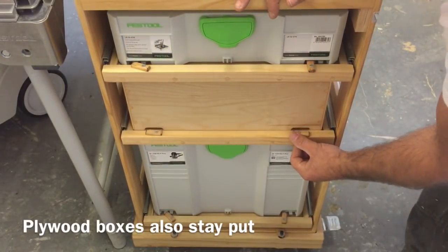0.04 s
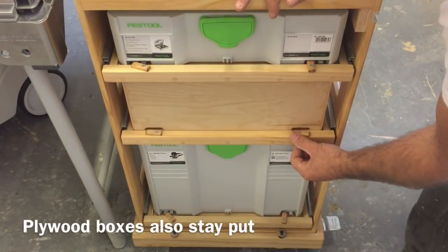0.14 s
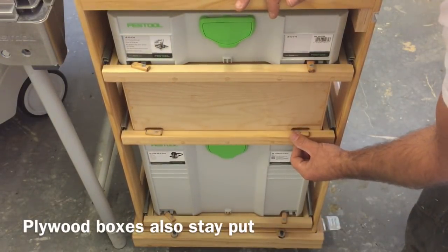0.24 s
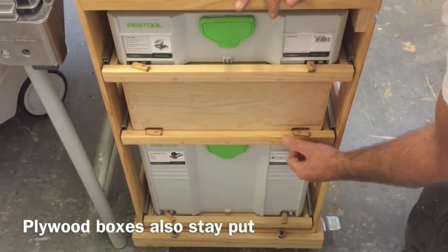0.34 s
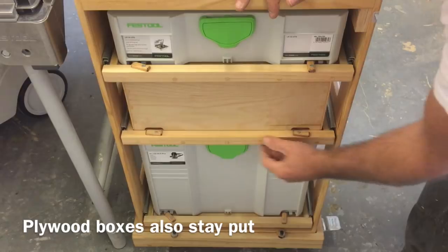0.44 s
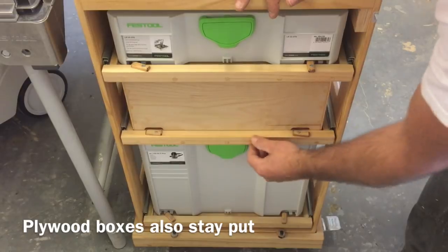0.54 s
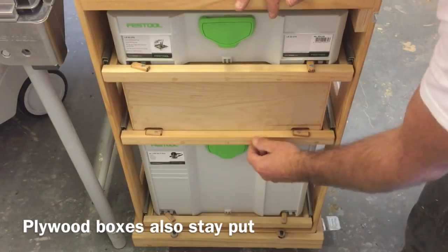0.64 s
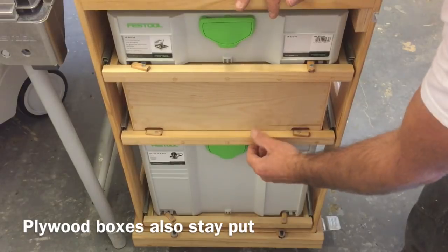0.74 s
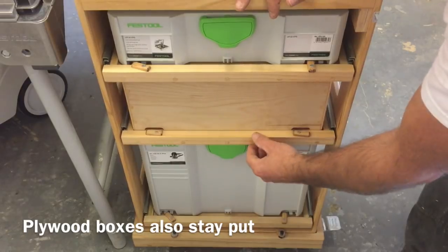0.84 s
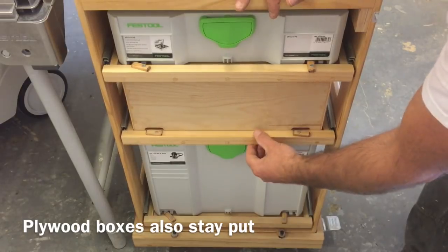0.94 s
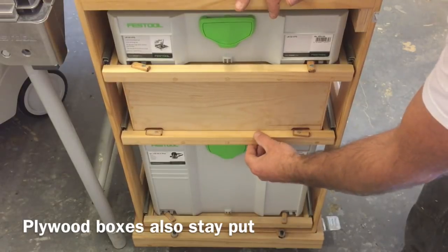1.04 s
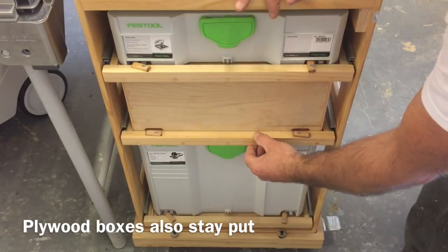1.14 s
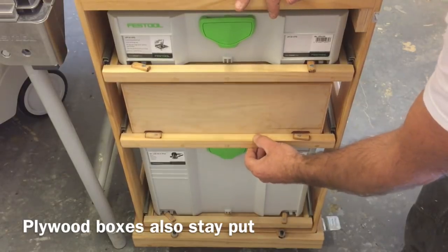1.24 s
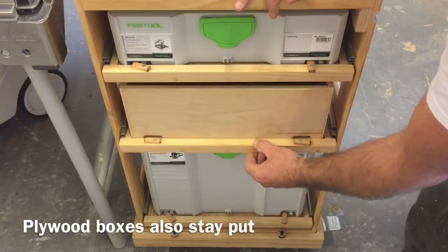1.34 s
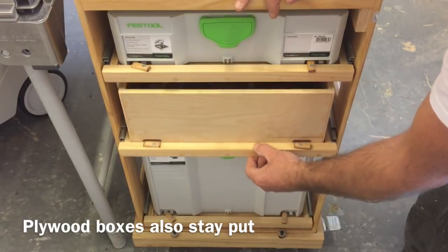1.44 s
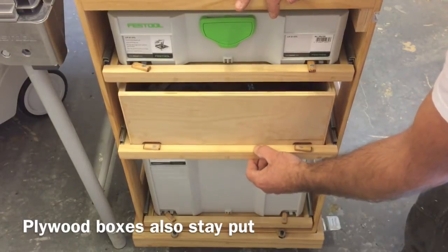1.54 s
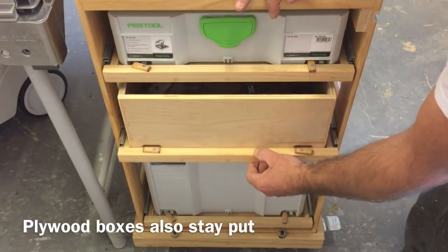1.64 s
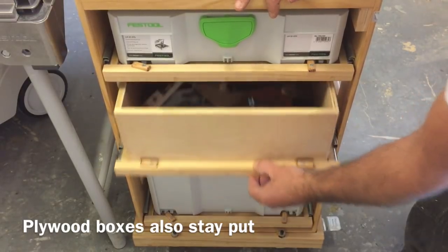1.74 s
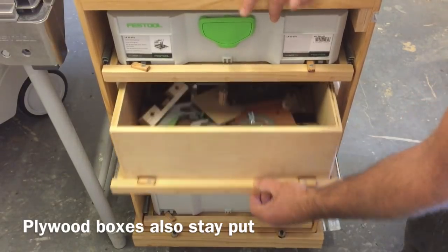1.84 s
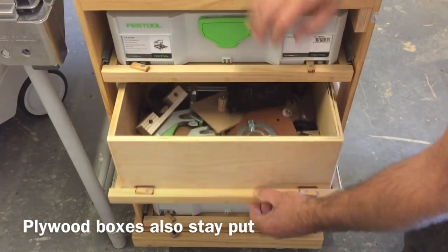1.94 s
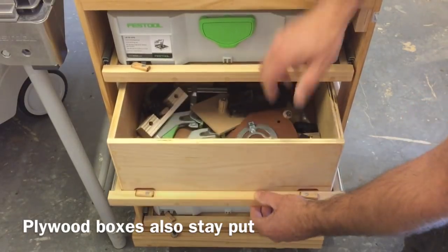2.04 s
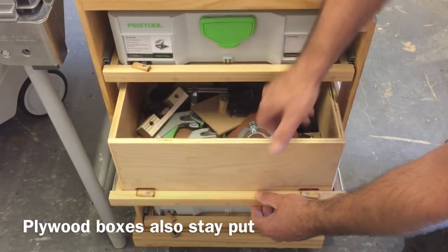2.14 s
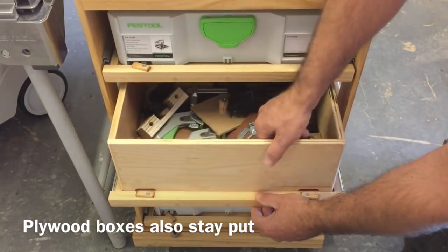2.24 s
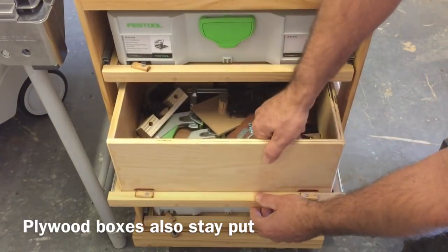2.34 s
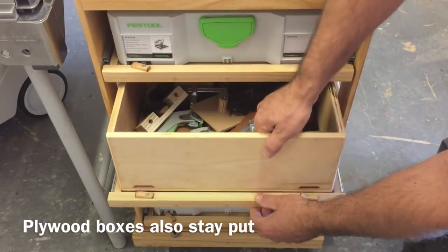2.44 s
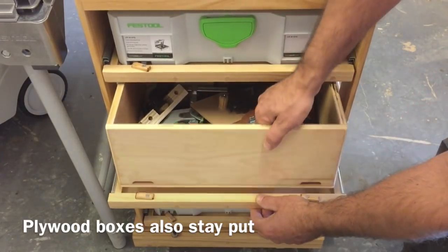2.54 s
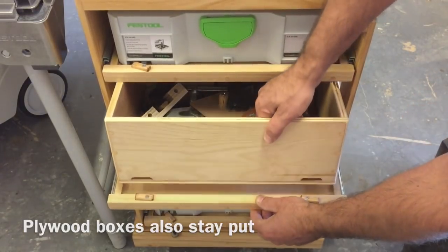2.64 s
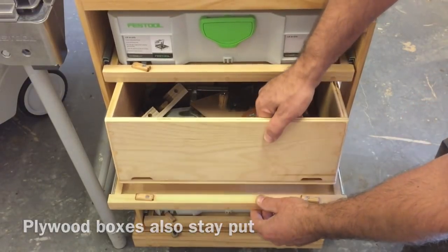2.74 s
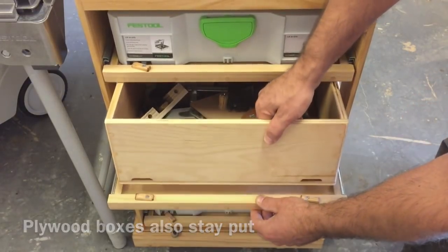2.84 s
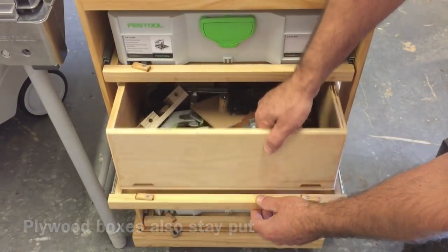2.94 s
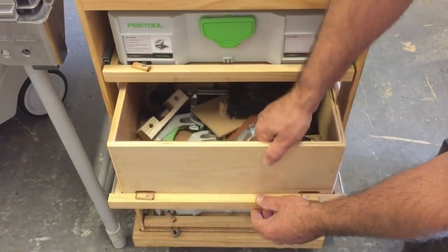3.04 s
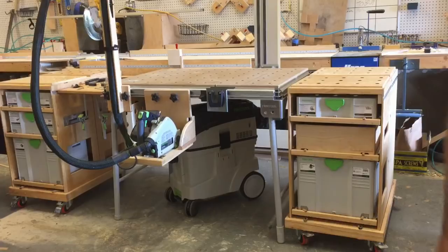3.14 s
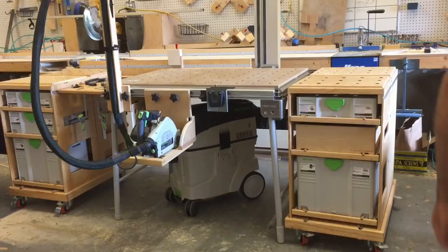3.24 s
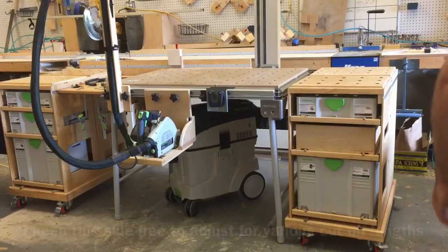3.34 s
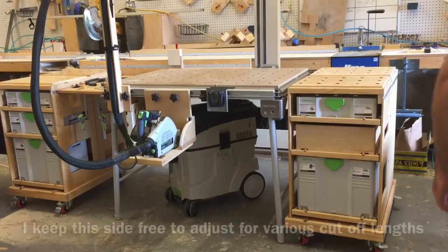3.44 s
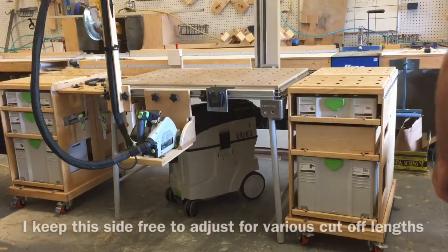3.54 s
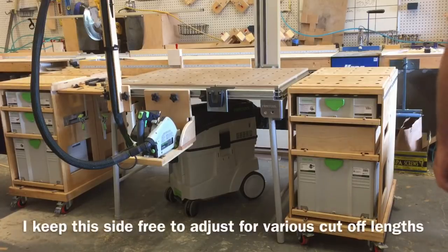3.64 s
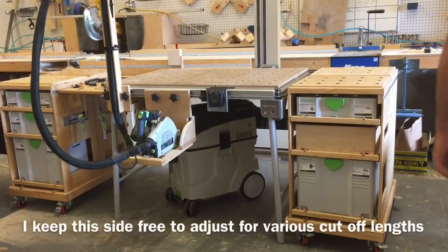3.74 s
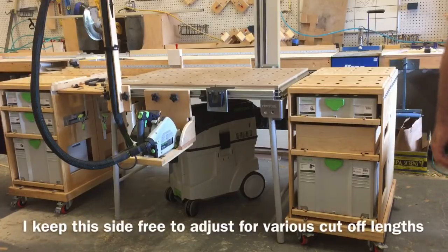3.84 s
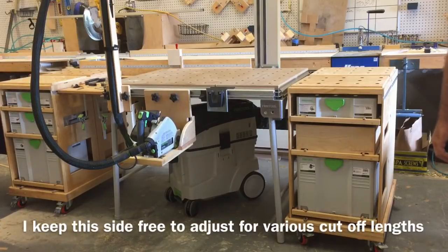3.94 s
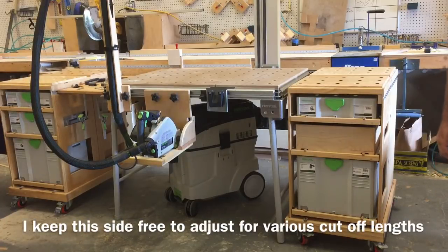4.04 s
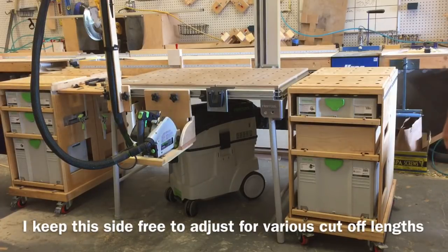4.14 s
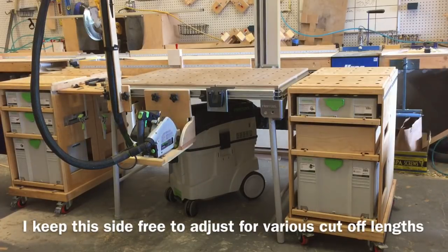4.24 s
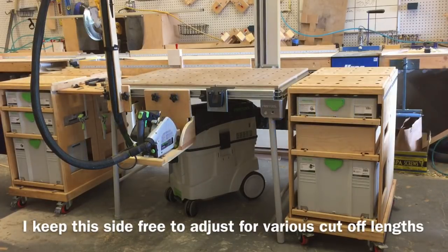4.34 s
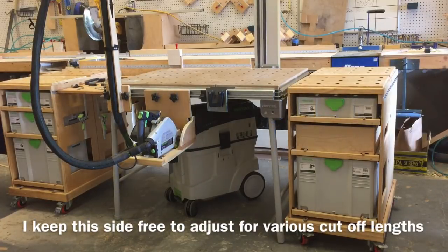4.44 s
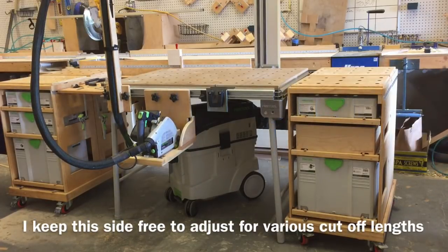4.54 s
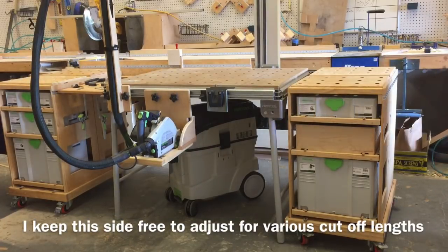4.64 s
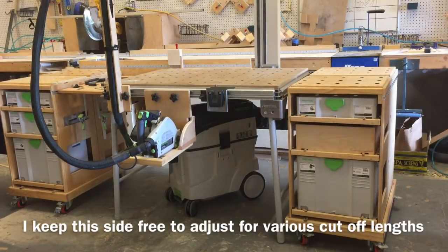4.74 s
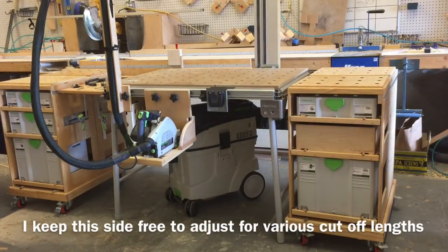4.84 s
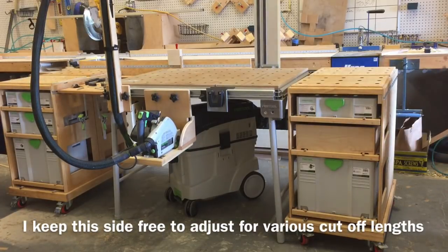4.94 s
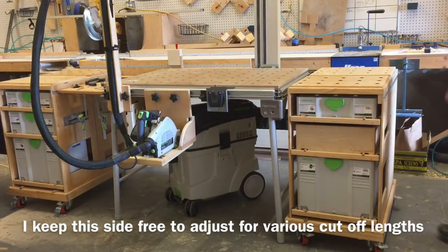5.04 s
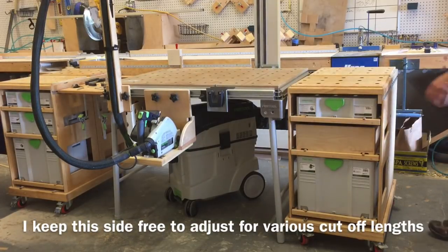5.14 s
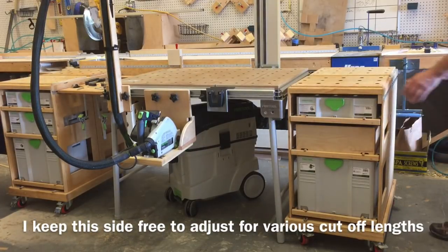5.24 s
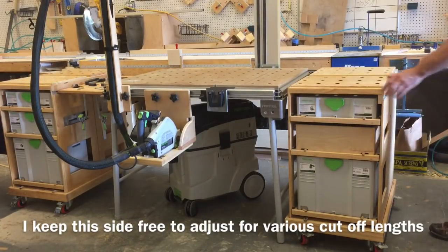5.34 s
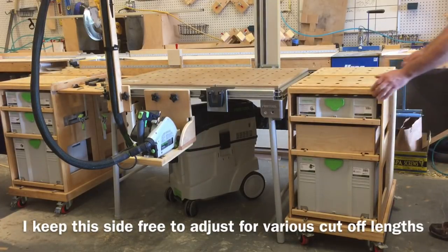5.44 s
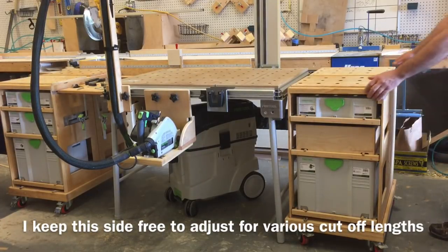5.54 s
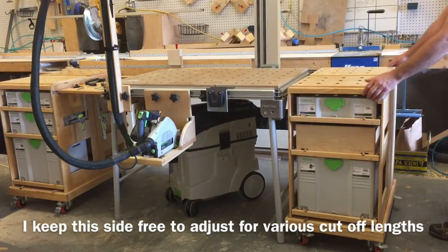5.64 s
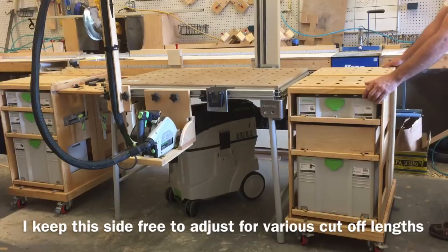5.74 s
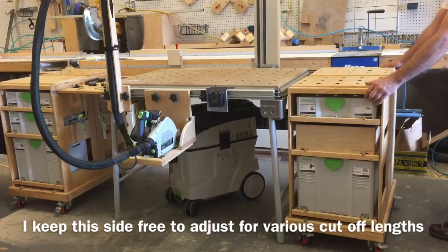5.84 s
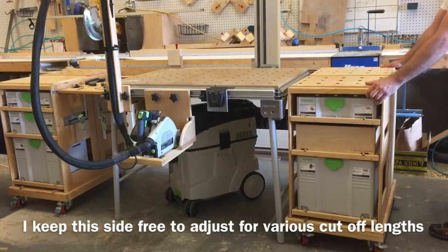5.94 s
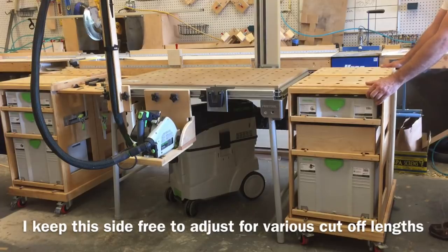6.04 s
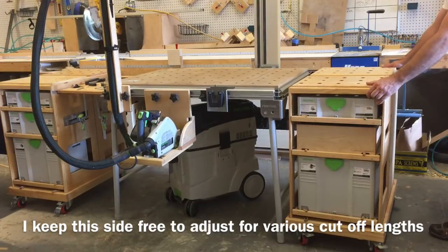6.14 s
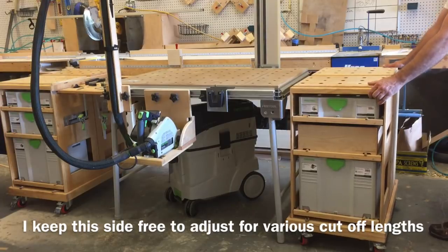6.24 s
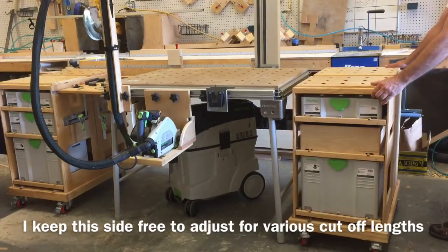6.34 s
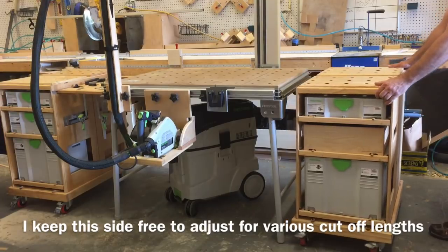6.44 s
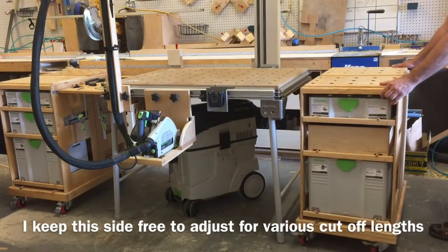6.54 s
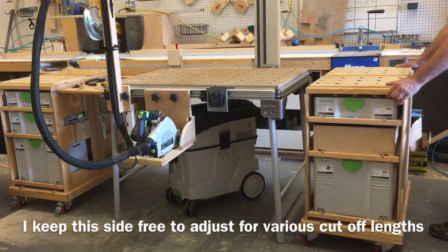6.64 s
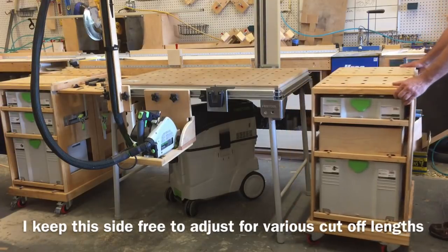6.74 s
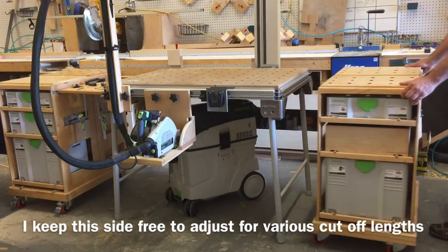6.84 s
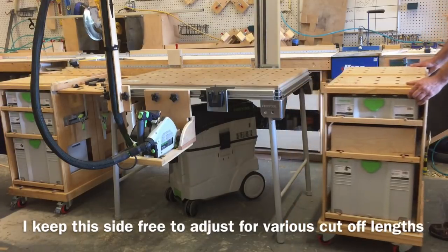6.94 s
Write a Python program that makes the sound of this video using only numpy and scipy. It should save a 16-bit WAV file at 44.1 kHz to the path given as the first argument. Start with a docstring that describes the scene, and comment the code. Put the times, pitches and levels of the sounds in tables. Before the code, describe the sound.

In a workshop, heard close up over quiet low air, a hand brushes wood at about 0.5 s, with small knocks at 0.6 and 0.8 s and faint shelf movement from 1.2 s. At 1.8 s a metal catch snaps and the shelf rolls out with bearing hiss, low rumble and a run of wooden knocks, steel clinking at 2.0 s. From 2.3 to 2.7 s a plywood box rasps along; at 2.78 s it lands with the loudest thud, a frame boom and metallic ringing, then a loose jig rocks in quickening, fading double taps. Around 3.16 s the sound cuts to a louder, humming room, with a thin brief squeal. Shoes scuff and step on concrete until about 4.7 s, amid rustling clothes. A light clack at 5.2 s marks a grip; from 6.3 s the cart jolts and rolls on grinding casters, booming increasingly to the end.

```python
"""In a woodshop, close to the microphone, a hand brushes wood, frees the catch of a cart's pull-out shelf
and rolls it out on bumping bearings. A plywood box of tools is dragged along, its panels rasping, until
it lands: wood modes thud, the frame booms, steel rings and a loose jig rocks to rest in double taps.
Then, farther off in a louder room, shoes scuff and step on concrete as filtered grains and soft bursts,
clothes rustle, and the cart is gripped and rolls away on grinding casters, its wood jolting."""
import sys
import numpy as np
from scipy import signal
from scipy.fft import rfft, irfft, next_fast_len
from scipy.io import wavfile
from scipy.ndimage import map_coordinates

SR = 44100
rng = np.random.default_rng(int(sys.argv[2]) if len(sys.argv) > 2 else 0)


def generate_wav(signal):
    """Clip the signal to [-1, 1] and save it as 16-bit WAV at the path in sys.argv[1]."""
    frames = np.transpose(np.atleast_2d(signal))
    scaled = np.clip(frames, -1, 1) * 32767
    pcm = np.round(scaled).astype(np.int16)
    wavfile.write(sys.argv[1], SR, pcm)


N = 307818
T = np.arange(N) / SR
MOVE_S = 3.162  # up to here the shop is heard beside the cart, afterwards from out in the room


def amp(db):
    """Decibels to gain."""
    return 10 ** (np.asarray(db) / 20)


def unit(x):
    """Scales to rms 1."""
    return x / np.sqrt(np.mean(x ** 2) + 1e-20)


def add(mix, s, sound):
    """Mixes a sound in at time s."""
    part = mix[round(s * SR):][:len(sound)]
    part += sound[:len(part)]


def shaped(x, gain):
    """Filters x by a function of frequency, to rms 1."""
    size = next_fast_len(len(x))
    hz = np.fft.rfftfreq(size, 1 / SR) + 1  # 1 Hz up, to keep logarithms finite
    return unit(irfft(rfft(x, size) * gain(hz), size)[:len(x)])


def coloured(x, points):
    """Gives x a spectral slope through (frequency [Hz], level [dB]) points, to rms 1."""
    hz, db = np.transpose(points)
    return shaped(x, lambda f: amp(np.interp(np.log(f), np.log(hz), db)))


def resonant(x, peaks):
    """Passes x through steep resonances (centre [Hz], nominal width [Hz], level [dB]), to rms 1."""
    def gain(f):
        return sum(amp(db) / (1 + ((f - hz) / (0.79 * width)) ** 2) for hz, width, db in peaks)
    return shaped(x, gain)


def swept(x, hz, width):
    """A broad resonance that follows the curve hz: shift down, low-pass, shift back; to rms 1."""
    turn = np.exp(2j * np.pi * np.cumsum(hz) / SR)
    lowpass = signal.butter(1, np.clip(width / 2, 5, 9000), fs=SR)
    return unit((turn * signal.filtfilt(*lowpass, x / turn)).real)


def level(s, db):
    """A gain curve through (time [s], level [dB]) points, at -140 dB outside its span."""
    return amp(np.interp(T, s, db, left=-140, right=-140))


def noise(size=N):
    """White noise."""
    return rng.standard_normal(size)


def grains(per_s, spread_db, smooth):
    """Tiny contacts of uneven size over a share of smooth friction."""
    sizes = amp(spread_db * np.minimum(rng.exponential(1, N), 4)) * rng.choice([-1, 1], N)
    contacts = unit(sizes * (rng.random(N) < per_s / SR))
    return unit(contacts + smooth * noise())


def flutter(hz, depth_db):
    """The uneven grip of a rubbing contact, as a gain that wavers mostly below hz."""
    sway = shaped(noise(), lambda f: 1 / (1 + (f / hz) ** 4))
    return unit(amp(depth_db * sway))


def stroke(s, rise, hold, release):
    """Force of a sliding contact: it climbs 20 dB in the rise, holds, and falls 20 dB per release."""
    before = np.maximum(s - T, 0) / max(rise, .003)
    after = np.maximum(T - s - hold, 0) / max(release, .003)
    return amp(-20 * np.minimum(before + after, 10))


def dying(t60, rise):
    """Envelope of a blow, half a second long: soft onset, exponential decay."""
    t = T[:SR // 2]
    return amp(-60 * t / max(t60, .005)) * (1 - np.exp(-t / max(rise, 1e-5)))


def blow(x):
    """Scales a blow to the energy of 10 ms at rms 1."""
    return x / np.sqrt(np.sum(x ** 2) / (SR / 100) + 1e-20)


def ring(modes, rise, detune):
    """Decaying modes; each blow lands on another spot, weighing and tuning them differently."""
    t = T[:SR // 2]
    chance = rng.standard_normal((len(modes), 2))
    out = np.zeros(len(t))
    for k, ((hz, db, t60), (weight, shift)) in enumerate(zip(modes, chance)):
        tone = np.sin(2 * np.pi * hz * (1 + detune * shift) * t)
        out += (-1) ** k * amp(db + 1.45 * weight) * dying(t60, rise) * tone
    return blow(out)


def burst(hz, octaves, t60, rise):
    """Decaying noise around hz, like a dense cluster of short modes."""
    band = shaped(noise(SR // 2), lambda f: np.exp(-.5 * (np.log2(f / hz) / octaves) ** 2))
    return blow(band * dying(t60, rise))


def struck(hits, modes, crack_db, crack_hz, crack_octaves, crack_t60, rise):
    """Blows on one object: its modes and the crack of the contact."""
    out = np.zeros(N)
    for s, db in hits:
        crack = amp(crack_db) * burst(crack_hz, crack_octaves, crack_t60, rise)
        add(out, s, amp(db) * (ring(modes, rise, detune=0.00057) + crack))
    return out


# air beside the cart and out in the room: (frequency [Hz], relative level [dB])
NEAR_AIR = [(15, -43), (25, -10), (39, -17), (59, -6), (130, -10.5), (149, -10), (427, -23.5), (516, -27),
            (2110, -32.5), (2760, -32.5), (7110, -38.5), (16000, -44.5)]
FAR_AIR = [(15, -41), (25, -27), (64, 3.5), (92, -33), (111, -12), (223, -4.5), (384, -26), (427, -16.5),
           (476, -39), (516, -23.5), (714, -26.5), (1840, -27), (16000, -42.5)]
NEAR_AIR_DB, FAR_AIR_DB = -64.15, -62
# machines out in the room: (centre [Hz], nominal width [Hz], level [dB])
MACHINE_HUM = [(53.3, 7.9, -62), (117, 3.6, -69), (219, 99, -70)]


def air():
    """Steady coloured noise of the shop; out in the room it is louder and machines hum in narrow bands."""
    hum = sum(amp(db) * resonant(noise(), [(hz, width, 0)]) for hz, width, db in MACHINE_HUM)
    near_air = amp(NEAR_AIR_DB) * coloured(noise(), NEAR_AIR)
    far_air = amp(FAR_AIR_DB) * coloured(noise(), FAR_AIR)
    return np.where(T > MOVE_S, hum + far_air, near_air)


# grit of a coarse scrape and of a fine hiss: (frequency [Hz], relative level [dB])
SCRAPE_COLOUR = [(59, -68), (100, 1), (239, 1), (323, -5), (492, -5), (813, -15), (1260, -6.5), (2460, -11),
                 (2630, -19), (3440, -13.5), (4810, -39), (5500, -49), (7150, -66), (12100, -120)]
HISS_COLOUR = [(2240, -8), (3800, -0.5), (4550, -5.5), (4830, -13), (6000, -3.5), (7920, -11.5), (9040, -8),
               (10500, -15), (15200, -15.5), (16000, -60)]


def coarse_scrape():
    """Sparse grit under a fluttering grip, low and rough."""
    return coloured(grains(1200, 1.9, .5), SCRAPE_COLOUR) * flutter(hz=39.7, depth_db=4.0)


def fine_hiss():
    """Dense fine contacts, bright."""
    return coloured(grains(5000, 1.7, 0.24), HISS_COLOUR)


# clothes rustling: (full force from [s], hold [s], scrape level [dB])
RUSTLES = [(3.472, 0.13, -66), (4.071, 0.055, -62.5), (4.6, 0.2, -68.5), (5.163, 0.073, -67),
           (5.486, 0.082, -68.5), (5.72, 0.011, -63.5), (5.903, .03, -73)]
RUSTLE_RISE_S, RUSTLE_RELEASE_S = 0.07, 0.18
RUSTLE_HISS_DB = -2.5  # against the scrape


def clothes():
    """Cloth slides on cloth in soft strokes of scrape and hiss."""
    texture = coarse_scrape() + amp(RUSTLE_HISS_DB) * fine_hiss()
    out = np.zeros(N)
    for s, hold, db in RUSTLES:
        out += amp(db) * stroke(s, RUSTLE_RISE_S, hold, RUSTLE_RELEASE_S) * texture
    return out


# thin squeals: (full force from [s], rise [s], hold [s], release [s], centre [Hz], level [dB])
SQUEALS = [(2.267, 0.046, 0.12, .04, 8900, -76), (3.227, 0.022, 0.018, 0.031, 5960, -48.5),
           (4.806, .03, .008, .03, 6450, -67), (5.704, 0.023, .015, 0.067, 6850, -65.5)]


def squeals():
    """Rubbing surfaces squeal thinly: one high resonance fed with noise."""
    out = np.zeros(N)
    for *shape, hz, db in SQUEALS:
        out += amp(db) * stroke(*shape) * resonant(noise(), [(hz, 940, 0)])
    return out


# soles sliding over concrete: (full force from [s], rise [s], hold [s], release [s],
# scrape level [dB], hiss level [dB], swish level [dB], swish centre [Hz])
SCUFFS = [(3.183, 0.034, 0.011, 0.058, -72, -56.5, -54, 3040),
          (3.226, 0.031, 0.018, 0.075, -49.5, -54, -53, 3900),
          (3.72, 0.081, 0.02, .16, -57.5, -59.5, -61, 2760),
          (3.813, .012, 0.011, 0.028, -59, -51.5, -60, 2210),
          (3.842, 0.018, 0.025, 0.035, -48, -48.5, -45.5, 3130),
          (4.29, 0.093, 0.051, 0.092, -49, -50.5, -46.5, 2550),
          (4.381, 0.027, 0.018, .04, -47.5, -53, -49, 1980),
          (4.417, 0.024, 0.024, 0.054, -48, -48.5, -46.5, 3900)]
SWISH_RISE_OCTAVES = 0.6  # the swish climbs from this far below its centre to this far above


def swish():
    """Each sliding sole sounds a broad resonance that climbs through the stroke."""
    force, weighted_hz = np.zeros(N), np.zeros(N)
    for s, rise, hold, release, _, _, db, hz in SCUFFS:
        gain = amp(db) * stroke(s, rise, hold, release)
        progress = np.clip((T - s - hold / 2) / (hold + rise / 2), -1, 1)
        force += gain
        weighted_hz += gain * hz * 2 ** (SWISH_RISE_OCTAVES * progress)
    grit = grains(2200, 4.1, 0.85) * flutter(hz=60, depth_db=2)
    return force * swept(grit, weighted_hz / force, width=2150)


def scuffs():
    """Shoe soles slide on concrete: coarse scrape, fine hiss and the climbing swish."""
    scrape, hiss = coarse_scrape(), fine_hiss()
    out = swish()
    for *shape, scrape_db, hiss_db, _, _ in SCUFFS:
        out += stroke(*shape) * (amp(scrape_db) * scrape + amp(hiss_db) * hiss)
    return out


# footfalls: (time [s], thump level [dB], slap level [dB], slap centre [Hz])
STEPS = [(3.455, -56.5, -78, 400), (3.542, -43, -46.5, 680), (3.7445, -50, -43.5, 610),
         (3.83, -50, -64, 350), (4.028, -56, -77, 418), (4.156, -46.5, -70, 413), (4.248, -53, -49, 590),
         (4.371, -44.5, -48.5, 500), (4.647, -45.5, -48.5, 614), (5.725, -71, -79, 394)]


def steps():
    """Soles land on concrete: a dull push and a short slap."""
    out = np.zeros(N)
    for s, thump_db, slap_db, slap_hz in STEPS:
        add(out, s, amp(thump_db) * burst(237, 0.77, t60=0.0756, rise=0.00079))
        add(out, s, amp(slap_db) * burst(slap_hz, 0.93, t60=0.09, rise=0.00039))
    return out


# plywood of box and cart: (mode [Hz], relative level [dB], t60 [s])
PLYWOOD = [(130.8, -8, 0.27), (202, 2, 0.087), (301, 5, 0.046), (359.5, -4, 0.32), (459, 6, 0.072),
           (591, 7.5, 0.032), (669, 4, 0.066), (744, -3, 0.13), (984, -31, 0.051), (1148, -0.5, 0.067),
           (1176, -25, 0.075), (1430, -64, 0.045), (1582, 4, 0.042), (1940, -4.5, 0.057),
           (2109, 9.5, 0.032), (2380, -2.5, 0.089), (2650, -31, 0.05), (3150, -5, 0.11), (3430, -15, 0.041)]


def excited(centre_hz, octaves):
    """The plywood's modes as one contact weighs them: soft contacts reach only the low ones."""
    modes = []
    for hz, db, t60 in PLYWOOD:
        loss_db = 10 / np.log(10) * (np.log2(hz / centre_hz) / octaves) ** 2
        modes.append((hz, db - loss_db, t60))
    return modes


def wood(thump_db, clack_db, clack_hz, thump_hz, joint_db):
    """Wood meets wood: the panels thump, and panels and joints clack."""
    thump = ring(excited(centre_hz=thump_hz, octaves=0.46), rise=0.0016, detune=0.017)
    panels = ring(excited(centre_hz=clack_hz, octaves=.8), rise=.0007, detune=.004)
    joints = burst(clack_hz, 0.66, t60=0.069, rise=.004)
    return amp(thump_db) * thump + amp(clack_db) * (amp(-7.5) * panels + amp(joint_db) * joints)


# the push on the cart: (full speed from [s], rise [s], hold [s], release [s])
PUSH = (6.43, 0.058, 0.44, 0.22)
# resonances of the cart's body: (centre [Hz], nominal width [Hz], relative level [dB])
CARCASS = [(135.6, 27, 21), (198, 65, -7), (95, 30, -27)]
# casters on rough concrete: (frequency [Hz], relative level [dB])
WHEEL_GRIT = [(140, -56), (230, 4), (333, 3), (465, -8), (613, -9), (965, -20.5), (1560, -31.5),
              (1880, -27), (2630, -64), (4000, -61), (5200, -72.5), (8800, -120)]
BOOM_DB, BOOM_GROWTH_DB_PER_S, WHEEL_GRIT_DB = -51, 18, -49  # the boom starts at BOOM_DB
# the cart is gripped, then jolts: (time [s], thump level [dB], clack level [dB], clack centre [Hz])
JOLTS = [(5.220, -63, -50, 2100), (6.303, -48.5, -61, 280), (6.381, -46, -59, 280),
         (6.416, -53, -43.5, 504), (6.430, -60, -44, 786), (6.554, -44, -58, 400), (6.607, -40, -47, 585),
         (6.674, -43, -48, 400), (6.702, -52, -59, 700), (6.746, -38.5, -55, 350), (6.835, -41, -52, 300),
         (6.864, -51, -46.5, 1750), (6.899, -38, -51.5, 965)]


def cart():
    """Casters grind over rough concrete; the body booms more through the push and knocks at each jolt."""
    start, _, hold, _ = PUSH
    boom_db = BOOM_DB + BOOM_GROWTH_DB_PER_S * np.clip(T - start, 0, hold)
    boom = amp(boom_db) * resonant(grains(250, 5.1, 0.68), CARCASS)
    grit = amp(WHEEL_GRIT_DB) * coloured(grains(260, 2.5, .55), WHEEL_GRIT)
    out = stroke(*PUSH) * (boom + grit)
    for s, *jolt in JOLTS:
        add(out, s, wood(*jolt, thump_hz=128, joint_db=-7.5))
    return out


# a hand brushing wood: (full force from [s], rise [s], hold [s], release [s],
# scrape level [dB], white hiss level [dB])
BRUSHES = [(0.495, 0.037, .025, 0.073, -64.5, -75), (0.613, 0.01, .031, 0.028, -55, -58.5),
           (1.99, 0.06, 0.063, 0.033, -58, -59), (2.37, 0.088, .02, .03, -62, -68)]


def hand_brushes():
    """Skin strokes the wood: the coarse scrape under plain white hiss."""
    scrape = coarse_scrape()
    out = np.zeros(N)
    for *shape, scrape_db, hiss_db in BRUSHES:
        out += stroke(*shape) * (amp(scrape_db) * scrape + amp(hiss_db) * noise())
    return out


# clicks of the shelf's catch and runners: (time [s], level before trim [dB])
CATCH_CLICKS = [(.782, -58.5), (1.7958, -30.5), (1.7985, -55), (2.664, -57), (3.144, -59.5)]
# the catch: (mode [Hz], relative level [dB], t60 [s])
CATCH_MODES = [(3460, -1, 0.076), (3690, 13, 0.021), (3880, 3, 0.029), (4120, 9, 0.037),
               (4640, -2.5, 0.051), (5000, 14, 0.023), (6250, -13.5, 0.017), (6640, -27, 0.042),
               (6850, -2, 0.076), (8300, -3, 0.059), (9200, -8, 0.023), (12100, -20, 0.024)]


def catch():
    """The catch snaps: short bright metal modes and a crack."""
    clicks = struck(CATCH_CLICKS, CATCH_MODES, crack_db=-3.0, crack_hz=4840, crack_octaves=0.87,
                    crack_t60=0.061, rise=0.0003)
    return amp(-1) * clicks  # trim


# pulls of the shelf along its runners: (full force from [s], rise [s], hold [s], release [s],
# rumble level [dB], bearing hiss level at full force [dB])
PULLS = [(1.22, 0.073, 0.037, 0.31, -63, -75), (1.42, .12, 0.018, 0.46, -60, -66),
         (1.799, 0.026, 0.15, 0.15, -40, -47.5)]
# the shaking shelf: (centre [Hz], nominal width [Hz], relative level [dB])
RUMBLE = [(135, 8, -3), (216, 71, -0.5), (305, 58, 2.5), (473, 180, -14), (700, 77, -10.5), (914, 100, -8),
          (1270, 2300, -38)]
# bearing balls: (frequency [Hz], relative level [dB])
BEARINGS = [(710, -24), (1200, 9.5), (1640, 2), (3010, -0.5), (5410, -7.5), (5900, -17), (6230, -9),
            (7910, -12.5), (11700, -31), (16000, -30)]
BEARING_SAG_DB_PER_S = 57  # the bearings quieten through the hold, after the first jerk
RUMBLE_LAG_S = 0.012  # the heavy shelf starts to shake after the bearings move


def shelf():
    """Bearing balls bump along the runners, hissing, and shake the heavy shelf into a rumble."""
    rumble = resonant(grains(400, 2.4, 0.84), RUMBLE)
    hiss = coloured(grains(1100, 2.6, 0.98), BEARINGS)
    out = np.zeros(N)
    for s, rise, hold, release, rumble_db, hiss_db in PULLS:
        sag_db = BEARING_SAG_DB_PER_S * np.clip(T - s, 0, hold)
        out += amp(hiss_db - sag_db) * stroke(s, rise, hold, release) * hiss
        out += amp(rumble_db) * stroke(s + RUMBLE_LAG_S, rise, hold, release) * rumble
    return out


# the box's weight shakes the whole frame: (time [s], level [dB])
LANDING = [(2.785, -28.5)]
# the frame: (mode [Hz], relative level [dB], t60 [s])
FRAME = [(79.5, -10, 0.13), (116, -4, 0.17), (238.3, -4.5, 0.25)]


def frame():
    """The frame booms in a few low modes when the box lands."""
    out = np.zeros(N)
    for s, db in LANDING:
        add(out, s, amp(db) * ring(FRAME, rise=.004, detune=.005))
    return out


# steel parts clinking together: (time [s], level before trim [dB])
CLINKS = [(2.0015, -34), (2.7755, -53), (2.7915, -44), (2.8020, -49), (2.865, -50)]
# the steel: (mode [Hz], relative level [dB], t60 [s])
STEEL = [(5800, -10, 0.1), (8120, 0, .03), (8250, -3, 0.051), (11200, -4, 0.054), (11680, -7, .03),
         (13800, -9, .06), (14400, -12, .035)]


def steel_clinks():
    """Steel parts knock together: very high modes and a sharp crack."""
    clinks = struck(CLINKS, STEEL, crack_db=-0.5, crack_hz=9000, crack_octaves=0.58,
                    crack_t60=0.041, rise=.0002)
    return amp(-13.0) * clinks  # trim


# one small tool is struck as the box lands: (time [s], level before trim [dB])
PING = [(2.7962, -34.5)]
# the small tool: (mode [Hz], relative level [dB], t60 [s])
PING_MODES = [(6550, 14, 0.021), (6800, -10, 0.075), (12300, -10, .03)]


def tool_ping():
    """A small tool rings in three high modes."""
    ping = struck(PING, PING_MODES, crack_db=-25, crack_hz=6940, crack_octaves=.8,
                  crack_t60=.02, rise=0.00033)
    return amp(-13.5) * ping  # trim


# the loose jig and the metal bar beside it: (mode [Hz], relative level [dB], t60 [s])
JIG = [(459, 16.5, 0.068), (695, 13.5, 0.058), (794, -45.5, 0.083), (966, 8, 0.082), (1500, -24, 0.065),
       (1780, -1, 0.08)]
BAR = [(1920, -2, 0.055), (1990, -19, 0.076), (2850, -31, 0.1)]
ROCK_S, SWING_S, SWING_RATIO = 2.872, .074, .85  # first tap, first swing, each swing against the last
SECOND_TAP_S, SECOND_TAP_DB = .021, -5  # second of a double tap, against the first
ROCK_DB, ROCK_LOSS_DB = -49, 2.3  # first tap, loss per swing
BAR_DB, BAR_LOSS_DB = -55, 4.5  # first nudge, loss per swing


def rocking(delay, db, loss_db, count):
    """Taps (time [s], level [dB]) of a rocking object, ever closer and weaker."""
    swing = np.arange(count)
    elapsed = SWING_S * (1 - SWING_RATIO ** swing) / (1 - SWING_RATIO)
    return zip(ROCK_S + delay + elapsed, db - loss_db * swing)


def rocking_jig():
    """A loose jig rocks to rest in the box in double taps; the second tap nudges a metal bar."""
    first_taps = rocking(0, ROCK_DB, ROCK_LOSS_DB, count=5)
    second_taps = rocking(SECOND_TAP_S, ROCK_DB + SECOND_TAP_DB, ROCK_LOSS_DB, count=4)
    jig = struck([*first_taps, *second_taps], JIG, crack_db=-9.5, crack_hz=780, crack_octaves=1.24,
                 crack_t60=0.12, rise=0.0014)
    nudges = rocking(SECOND_TAP_S, BAR_DB, BAR_LOSS_DB, count=2)
    bar = struck(nudges, BAR, crack_db=-26, crack_hz=1980, crack_octaves=0.63, crack_t60=0.05, rise=0.004)
    return jig + bar


# the box dragged over the shelf: (time [s], level before the layer gains [dB], centre of the rasp [Hz])
DRAG = [(2.24, -71, 572), (2.3, -57.5, 790), (2.336, -47.5, 724), (2.364, -48.5, 1140),
        (2.436, -47.5, 1340), (2.614, -49, 900), (2.722, -59, 615), (2.76, -78, 721)]
# panels of the box: (centre [Hz], nominal width [Hz], relative level [dB])
PANELS = [(646, 72, -2.5), (775, 91, -29), (984, 39, -5), (1210, 190, -14), (1410, 150, -5),
          (1630, 150, -10.5), (2320, 31, 6.5), (3055, 80, 5.5)]
# grit under the box: (frequency [Hz], relative level [dB])
DRAG_GRIT = [(59, -46), (100, -2), (153, -4.5), (1360, -9.5), (2000, -22), (2370, -11), (2750, -23.5),
             (16000, -41.5)]


def box_drag():
    """Wood fibres catch and slip, sounding the panels of the box, whose pitch wavers slightly, irregularly."""
    s, db, hz = np.transpose(DRAG)
    slips = grains(900, 2.5, .4) * flutter(hz=70, depth_db=2.2)
    # reading the panels at a randomly uneven speed makes their pitch waver
    speed = 1 + .012 * shaped(noise(), lambda f: 1 / (1 + (f / 12) ** 4))
    clock = np.cumsum(speed)
    panels = map_coordinates(resonant(slips, PANELS), [clock], order=3, mode="mirror")
    rasp = swept(panels, np.interp(T, s, hz), width=960)
    grit = coloured(noise(), DRAG_GRIT)
    return level(s, db) * (amp(-2.5) * rasp + amp(-8) * grit)


# wooden knocks of shelf and box: (time [s], thump level [dB], clack level [dB], clack centre [Hz])
KNOCKS = [(0.6126, -51, -44.5, 750), (0.78, -57, -43.5, 1480), (0.790, -59, -44.5, 270),
          (0.799, -38.5, -62, 400), (1.199, -57, -56, 1140), (1.371, -48.5, -53.5, 320),
          (1.409, -50.5, -57, 2000), (1.797, -59, -36, 1200), (1.8226, -57, -32, 1180),
          (1.925, -52.5, -45, 300), (1.954, -34, -53, 320), (2.002, -43, -39.5, 1110),
          (2.018, -42.5, -42.5, 1410), (2.045, -40.5, -50.5, 1420), (2.206, -41.5, -53, 380),
          (2.229, -45, -58, 430), (2.261, -49, -75, 1080), (2.340, -44.5, -41.5, 594),
          (2.381, -48.5, -43.5, 950), (2.764, -54, -49, 1900), (2.7755, -43, -36, 900),
          (2.7794, -26.5, -29.5, 533), (2.7862, -54, -22, 770), (2.792, -25.5, -26, 1050),
          (2.823, -43, -41, 900)]
# edge tick against a clack at 1 kHz; harder contacts tick more
TICK_DB, TICK_DB_PER_OCTAVE = -17.5, 8


def knocks():
    """Shelf and box knock close to the microphone, so the tick of their edges is heard too."""
    out = np.zeros(N)
    for s, thump_db, clack_db, clack_hz in KNOCKS:
        tick_db = clack_db + TICK_DB + TICK_DB_PER_OCTAVE * np.log2(clack_hz / 1000)
        tick = amp(tick_db) * burst(2400, 0.98, t60=0.051, rise=0.0015)
        add(out, s, wood(thump_db, clack_db, clack_hz, thump_hz=183, joint_db=-7) + tick)
    return out


def room(x, wet_db, t60, treble_t60):
    """Adds scattered reflections whose treble dies sooner."""
    size = SR // 2
    low = shaped(noise(size), lambda f: 1 / (1 + f / 3000)) * dying(t60, 0.0013)
    high = shaped(noise(size), lambda f: f / (f + 4000)) * dying(treble_t60, 0.0027)
    tail = .5 * low + high
    return x + amp(wet_db) * signal.fftconvolve(x, tail / np.linalg.norm(tail))[:N]


def scene():
    """Air, sounds close by, and those with a little more room; all rubbing shares the roomier setting."""
    rubbing = clothes() + squeals() + scuffs() + hand_brushes()
    roomier = rubbing + steps() + cart()
    metal = catch() + steel_clinks() + tool_ping()
    close = metal + shelf() + frame() + rocking_jig() + box_drag() + knocks()
    far_mix = room(roomier, wet_db=-12.5, t60=0.5, treble_t60=0.48)
    close_mix = room(close, wet_db=-14.0, t60=0.46, treble_t60=0.32)
    return (air() + far_mix + close_mix)[None]


MIC_LOW_HZ, EDGE_HZ = 44.3, 15950


def record(dry):
    """The microphone sheds the deepest bass; the level dips briefly; then the band limit."""
    low_cut = signal.butter(3, MIC_LOW_HZ, "highpass", fs=SR, output="sos")
    thinned = signal.sosfilt(low_cut, dry)
    dip = 1 - .9 * np.exp(-((T - MOVE_S) / .006) ** 2)  # down to a tenth for some milliseconds
    band_limit = signal.firwin(511, EDGE_HZ, window=("kaiser", 9), fs=SR)
    return signal.oaconvolve(thinned * dip, band_limit[None], "same")


dry = scene()
out = record(dry)
generate_wav(out)
```